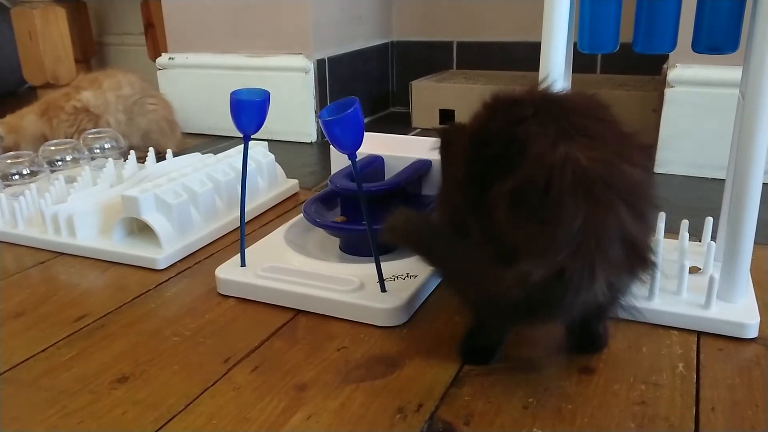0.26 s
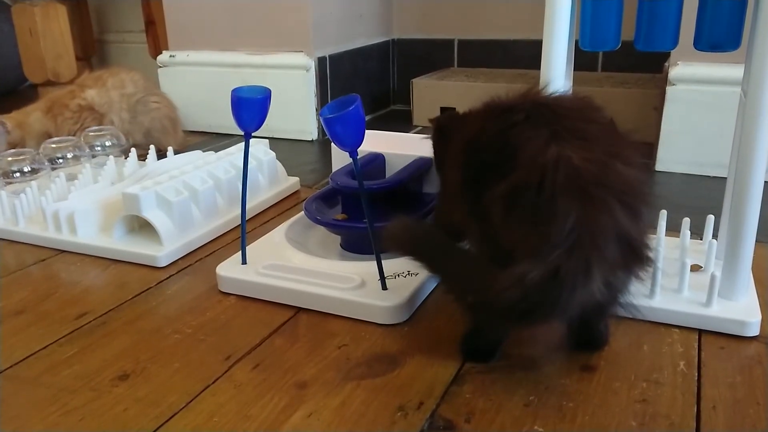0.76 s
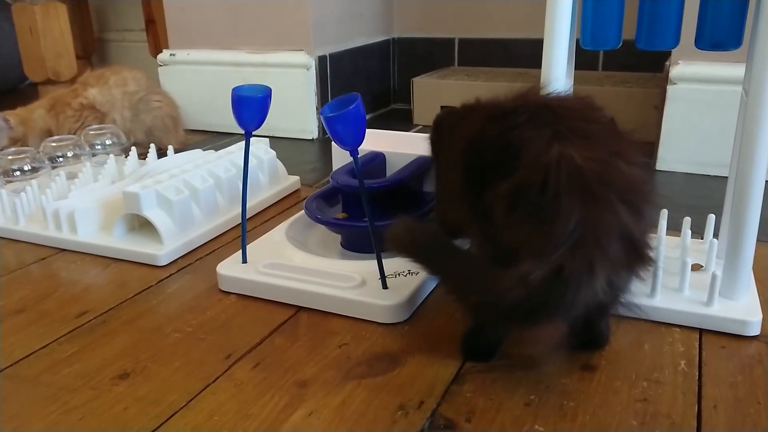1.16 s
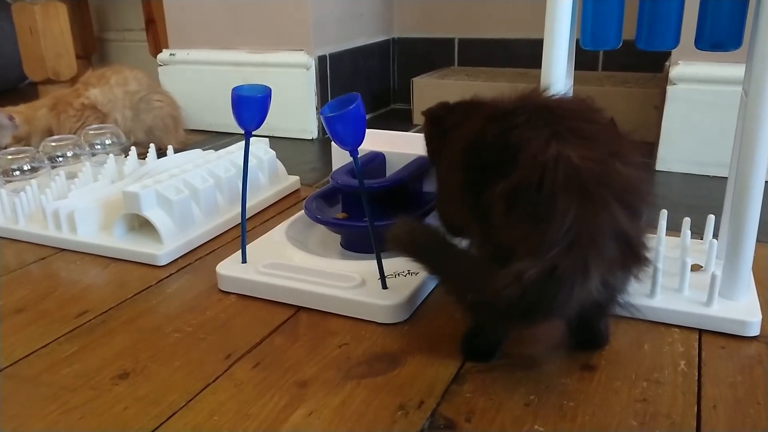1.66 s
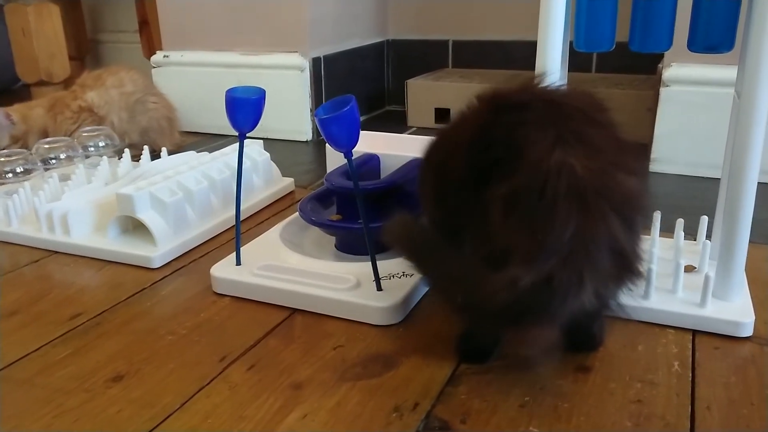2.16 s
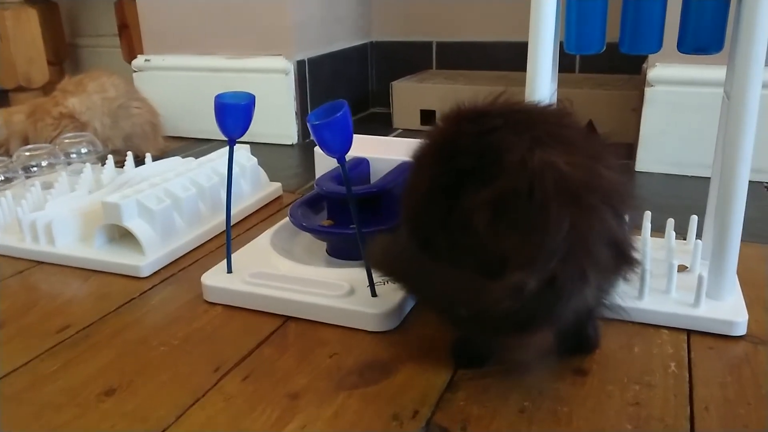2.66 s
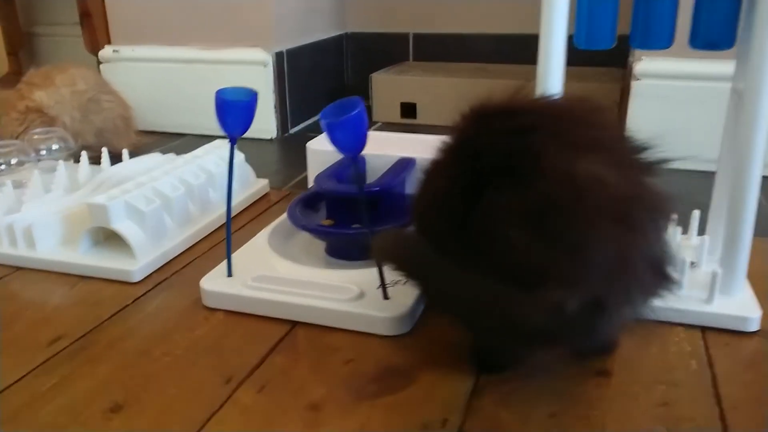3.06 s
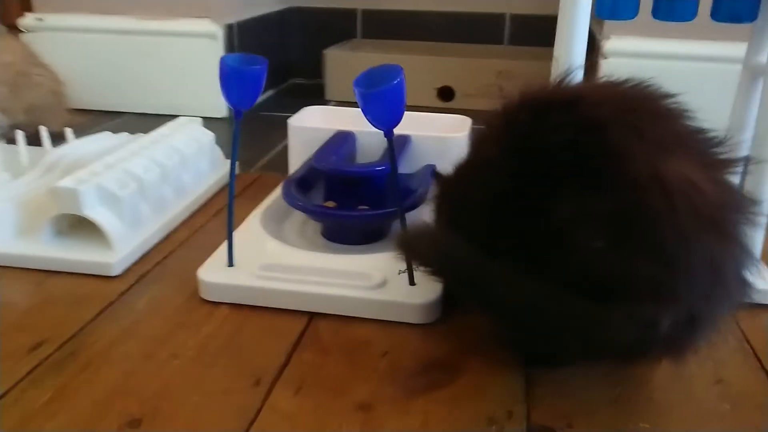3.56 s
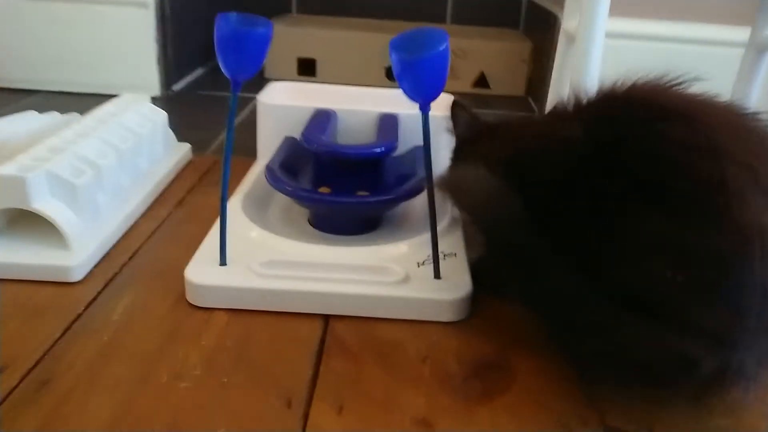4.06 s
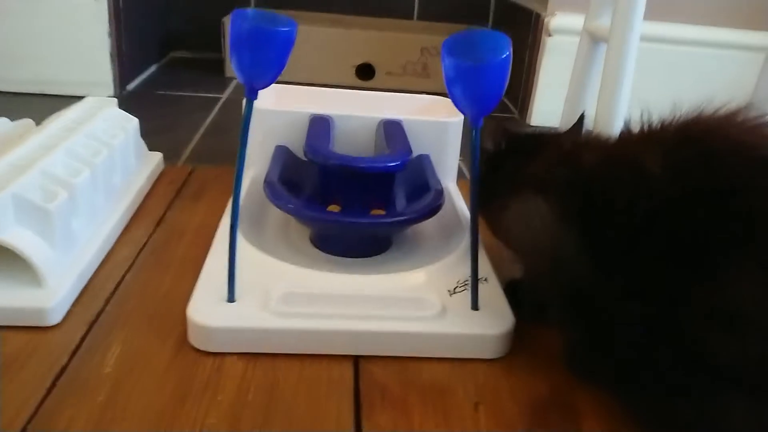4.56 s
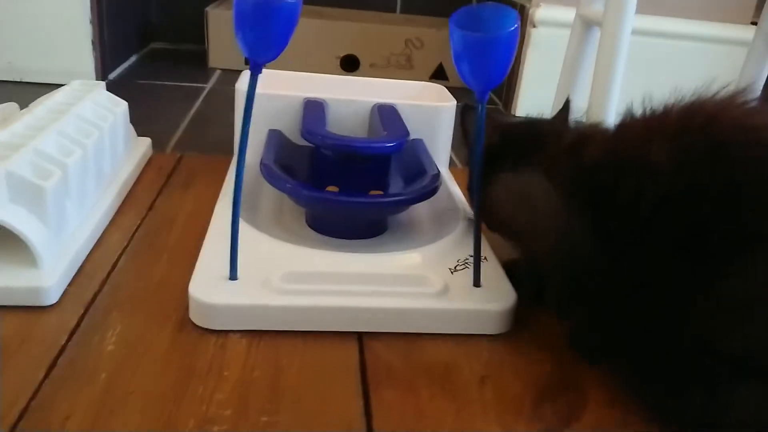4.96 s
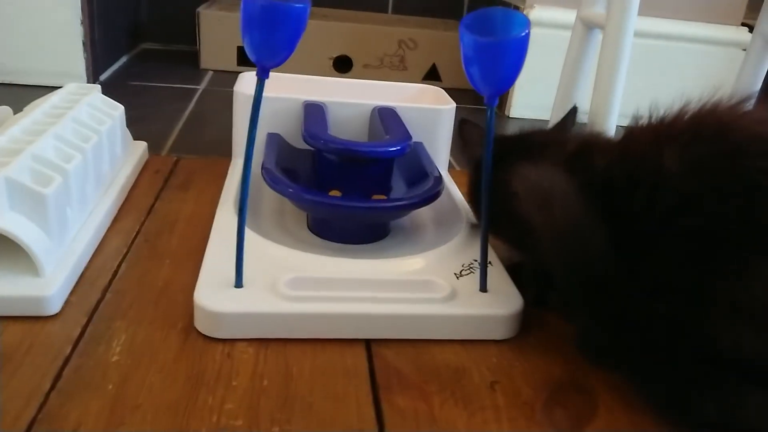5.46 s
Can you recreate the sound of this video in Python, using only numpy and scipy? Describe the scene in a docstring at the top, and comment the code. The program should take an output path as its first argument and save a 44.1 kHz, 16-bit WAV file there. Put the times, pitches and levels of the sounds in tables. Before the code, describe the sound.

A kitten paws a plastic feeder with light clicks, then fingers rub, creak and thump loudly against the microphone.

```python
"""Kitten at a puzzle feeder

A kitten paws a plastic feeder on a wooden floor: light clicks ring in a small room, and claws squeak. Then a
hand-held camera is moved: fingers bump, slip and creak at its two microphone ports. Cloth and fur rustle over
room tone and mains hum. The left port is open and bright; the right one lies under the hand and hears the room
muffled."""
import sys
import numpy as np
from scipy import signal
from scipy.io import wavfile
from scipy.ndimage import uniform_filter1d

SR = 44100
rng = np.random.default_rng(int(sys.argv[2]) if len(sys.argv) > 2 else 0)


def unload_audio(sound):
    """Save the sound as a 16-bit wav file, at the path given as the first command line argument."""
    columns = np.transpose(np.atleast_2d(sound))
    # keep every value between -1 and 1, then stretch to whole-number steps
    steps = np.round(np.clip(columns, -1, 1) * 32767)
    wavfile.write(sys.argv[1], SR, steps.astype(np.int16))


N = 252250

# Tone of skin scraping the right port. Each row: frequency in Hz, relative level in dB.
SKIN_SPECTRUM = [(300, -52.5), (700, -47.5), (1500, -46.5), (2500, -49.5), (3500, -52.5), (4800, -59.5),
                 (6000, -80.5), (7500, -70.5), (10000, -70.5), (12500, -78.5), (15500, -83)]


def feeder_clicks():
    """A claw or treat chatters against dead plastic; the room smears each contact into a tail."""
    # Each row: start in seconds, relative level in dB, bright edge in dB against it, chatter rise in ms.
    contacts = [(0.538, -37, -20, 1.94), (0.56, -26.5, -19, 1.9), (0.734, -46, -11, 2.1),
                (0.756, -37.5, -18.5, 2.1), (0.898, -46, -15, 1.88), (1.221, -39, -11.5, 1.81),
                (1.471, -40.5, -20, 1.48), (1.576, -52.5, -15.5, 4.7), (1.714, -51.5, -12, 3.5),
                (1.836, -49, 17.5, 0.85), (1.878, -42, -7, 2.14), (1.886, -44.5, 8.5, 1.96),
                (1.930, -34, -5, 0.9), (3.378, -44.5, 8.5, 0.87), (4.498, -43, -13, 2.4),
                (4.648, -46.5, -12, 1.26), (4.78, -48, -17, 0.98), (4.93, -53.5, -24, 1.4),
                (4.984, -44, -14, 1.46), (5.405, -52, -21, 2), (5.51, -54, -15, 1.75)]
    # A hollow clack and its hard, bright edge. Each row: frequency in Hz, gain in dB.
    clack_eq = [(700, -32), (1500, -7), (1950, 3), (2450, -3.5), (2950, -4), (3450, -3), (3900, -5),
                (4700, -5.5), (5700, -1), (6800, -17), (11000, -52)]
    edge_eq = [(2500, -8.5), (4000, 5), (8000, 2), (10500, -2.5), (12000, -26)]
    direct, send = np.zeros((2, 2, N))
    t = np.arange(4000) / SR
    chatter = rng.standard_normal((len(contacts), 2, len(t)))
    for (start, db, edge_db, ms), noise in zip(contacts, chatter):
        rattle = noise[:, :200] * np.exp(-t[:200] / .002) / 16
        rattle[:, 0] = 1  # one blow and a little rattle give each tail its own colour
        fill = ms ** 1.48  # longer contacts fill the room more
        for layer, gain in enumerate(gain_of([db, db + edge_db])):
            add(direct[layer], start, gain * noise[layer] * pulse(1000 * t / ms))
            add(send[layer], start + ms / 1000, gain * fill * rattle[layer])
    direct, send = (colour(clack, clack_eq) + colour(edge, edge_eq) for clack, edge in (direct, send))
    return gain_of(4.0) * direct + gain_of(19.5) * room_reverb(send)


def claw_squeaks():
    """A claw drags on plastic: short, fuzzy tones that swell and fade."""
    # Each row: start in seconds, length in seconds, pitch in Hz, level in dB.
    drags = [(1.384, 0.058, 5340, -63.5), (1.56, 0.017, 2440, -54), (1.682, 0.047, 3330, -59)]
    fuzz = 0.064  # bandwidth as a share of the pitch
    out = np.zeros(N)
    for start, length, hz, db in drags:
        t = np.arange(0, length, 1 / SR)
        wander = uniform_filter1d(rng.standard_normal((2, 4000)), round(SR / (fuzz * hz)))[:, :len(t)]
        tone = (np.exp(2j * np.pi * hz * t) * (wander[0] + 1j * wander[1])).real
        swell = np.sqrt(np.sin(np.pi * t / length))
        add(out, start, gain_of(db) * swell * unit_rms(tone))
    return out


def hand_bumps():
    """Each push of the hand moves a diaphragm once: a thump, dulled by soft flesh."""
    # Left port, then right. Each row: start in seconds, push in dB, rise time in ms.
    pushes = [
        [(1.773, -11.5, 13), (2.359, -12, 11), (2.476, -10, 11), (2.553, -4, 12.5), (2.637, -5.5, 8.7),
         (2.752, -11.5, 8.3), (2.772, -10, 6.1), (2.786, -1.5, 16.4), (2.889, -13.5, 8.4), (2.904, -6, 8.3),
         (3.376, -5, 13), (4.832, -12.5, 9.8), (5.691, -14.5, 2.3)],
        [(3.002, -11.5, 0.16), (3.111, -15, 7.7), (3.531, -7.5, 0.92), (3.551, -8, 1.8), (3.573, -2, 0.65),
         (3.71, -4, 3.9), (3.898, 1.5, 3), (3.967, 2, 2.8), (4.007, -6.5, 0.93), (4.038, -7, 0.52),
         (4.111, -11.5, 1.35), (4.195, 7, 3.7), (4.322, 7.5, 11.8), (4.452, 5, 2.3), (4.542, 12, 7.7),
         (4.577, 2.5, 6.1), (4.677, -8, 7.7), (4.833, -10, 1.4), (4.853, -1, 3.6), (5.35, 0.5, 9.5),
         (5.372, -2.5, 5.9), (5.441, -15, 5.8), (5.688, -7, 2.7)],
    ]
    flesh_hz = 450
    out = np.zeros((2, N))
    for port, rows in zip(out, pushes):
        for start, db, ms in rows:
            add(port, start, -gain_of(db) * pulse(np.arange(4000) / (SR * ms / 1000)))
    return butterworth(out, 2, flesh_hz)


def skin_ticks():
    """Skin slips on the right port: a dry snap and a cavity ring of two or three cycles."""
    # Each row: start in seconds, relative level in dB, ring pitch in Hz.
    slips = [(1.769, -30, 1610), (2.355, -35, 520), (2.375, -32.5, 1650), (2.442, -47, 1400),
             (2.486, -40.5, 910), (2.525, -43.5, 885), (2.549, -41.5, 990), (2.595, -37.5, 523),
             (2.634, -37.5, 470), (2.889, -38.5, 467), (3.001, -25.5, 312), (3.081, -24, 2900),
             (3.114, -13, 2380), (3.221, -8, 2100), (3.279, -9, 2130), (3.434, -11, 2700),
             (3.527, -6.5, 2740), (3.549, -7.5, 2600), (3.571, -5.5, 1940), (3.62, -7, 1800),
             (3.736, -6.5, 635), (3.739, -9.5, 580), (3.766, -5.5, 760), (4.02, -14, 610),
             (4.037, -18.5, 605), (4.069, -33, 450), (4.107, -25.5, 430), (4.181, -32, 600),
             (4.324, -28.5, 392), (4.45, -30.5, 340), (4.577, -17, 584)]
    snaps, rings = np.zeros((2, N))
    t = np.arange(1000) / SR
    bursts = rng.standard_normal((len(slips), len(t))) * np.exp(-t / .0012)
    for (start, db, hz), burst in zip(slips, bursts):
        edge_hz = 2860 + 0.38 * hz  # softer skin: lower ring, duller snap
        add(snaps, start, gain_of(db) * butterworth(burst, 8, edge_hz))
        add(rings, start, gain_of(db + 2.0) * np.sin(2 * np.pi * hz * t) * pulse(hz * t / 0.56))
    rings = butterworth(rings, 4, 4500)  # the rings carry little treble
    peak_db = max(db for hz, db in SKIN_SPECTRUM)
    right = rings + gain_of(10.0 - peak_db) * colour(snaps, SKIN_SPECTRUM)
    through_case = colour(right, [(700, -29.5), (1400, -71)])  # only the dull part reaches the left
    return np.array([through_case, right])


def finger_rubbing():
    """Skin sticks and slips, scraping and creaking on the right; the grip shakes both ports."""
    # Each row: start in seconds, length in seconds, scrape in dB, creak in dB.
    slides = [(2.37, 0.21, -71, -47.5), (2.62, 0.99, -65, -43.5), (3.086, 0.024, -27, -28),
              (3.13, 0.0048, -33, -37), (3.184, 0.0032, -35.5, -45), (3.199, 0.0069, -33, -21),
              (3.216, 0.038, -24.5, -34), (3.33, 0.082, -39.5, -40), (3.374, 0.017, -33.5, -25),
              (3.415, 0.055, -26.5, -25.5), (3.5, 0.024, -22.5, -26), (3.528, 0.0037, -10.5, -13),
              (3.551, 0.0043, -14.5, -10), (3.571, 0.015, -14.5, -24.5), (3.595, 0.041, -18, -17.5),
              (3.665, 0.044, -41, -26.5), (3.737, 0.025, -39, -17), (3.757, 0.029, -37, -19),
              (3.838, 0.013, -40.5, -22.5), (3.895, 0.024, -35.5, -14), (3.948, 0.059, -38.5, -27.5),
              (4.19, 0.012, -48, -27.5), (4.569, 0.013, -39.5, -24.5), (4.68, 0.012, -57, -40),
              (4.832, 0.024, -58.5, -35.5)]
    # Strength of the shaking. Each row: time in seconds, left level in dB, right level in dB.
    grip = [(2.33, -48, -74), (2.38, -33.5, -50.5), (3.1, -34, -66), (3.6, -35, -47), (3.68, -55, -51),
            (3.76, -35, -24), (4.05, -40, -25), (4.3, -62, -28.5), (5.1, -53, -42), (5.72, -51, -43)]
    # A dull creak and a low rumble. Each row: frequency in Hz, relative level in dB.
    creak_eq = [(150, 6.5), (350, -5), (750, -11), (2000, -22), (7000, -77)]
    shake_eq = [(90, -2), (200, -22.5), (500, -33), (900, -42.5), (2000, -76.5)]
    # Skin grips fast and lets go slowly.
    scraping, creaking = (stroke_envelope(slides, column, 4000, 1499) for column in (2, 3))
    bunches = gain_of(3.3 * unit_rms(uniform_filter1d(rng.standard_normal(N), 160)))
    slips = bunches * (grains(5000, 2.3) + 0.52 * grains(350, 2.5))
    spectrum = signal.stft(colour(slips, SKIN_SPECTRUM), nperseg=128)[2]
    ridges = unit_rms(uniform_filter1d(rng.standard_normal(spectrum.shape), size=4, axis=0))
    spectrum *= gain_of(2.3 * ridges)  # each slip has its own colour
    scrape = scraping * unit_rms(signal.istft(spectrum, nperseg=128)[1][:N])
    creak = creaking * unit_rms(colour(grains(320, 2.2), creak_eq))
    left, right = (fader(grip, side) * unit_rms(colour(grains(70, 2.8), shake_eq)) for side in (1, 2))
    through_case = colour(scrape + creak, [(300, -29), (700, -43.0), (1400, -73)])
    return np.array([left + through_case, right + scrape + creak])


def cloth_rustle():
    """Cloth and fur brush in fine, patchy grains; a finger brushes past the left port only."""
    # Each row: time in seconds, rustle level in dB.
    movement = [(0, -76), (.35, -67), (1.7, -70), (2.45, -75), (2.63, -67.5), (2.73, -55.5), (2.95, -53),
                (3.3, -66), (3.37, -50.5), (3.5, -58.5), (3.7, -62), (4.03, -66.5), (4.2, -78.5),
                (4.35, -62), (4.8, -71.5), (4.9, -81), (5.4, -76.5), (5.72, -76.5)]
    # Tone of the fibres. Each row: frequency in Hz, relative level in dB.
    fibre_eq = [(1500, -104), (2200, -87), (2900, -95), (4200, -91.5), (5300, -84.5), (6600, -92),
                (8000, -87.5), (10500, -93), (15500, -112.2)]
    # Each row: start in seconds, length in seconds, relative level in dB.
    sweeps = [(3.522, 0.018, -44), (3.74, 0.059, -49.5), (3.969, 0.015, -33)]
    fibres = np.array([unit_rms(colour(grains(9000, 2.4), fibre_eq)) for _ in range(2)])
    spectrum = signal.stft(fibres, nperseg=512)[2]
    patches = uniform_filter1d(rng.standard_normal(spectrum.shape[1:]), 7, axis=0)
    patches = unit_rms(uniform_filter1d(patches, 10, axis=1))  # narrow bands come and go
    scuffs = unit_rms(signal.istft(spectrum * gain_of(3.2 * patches), nperseg=512)[1][:, :N])
    brush = butterworth(scuffs[0], 2, 1700, "high") * stroke_envelope(sweeps, 2, 3988, 2498)
    left, right = fader(movement, 1) * scuffs
    return np.array([left + brush, right])


def room_reverb(x):
    """The small room answers with two unrelated tails, the treble dying a little sooner."""
    # Each row: frequency in Hz, seconds to fall by 60 dB.
    decay_times = [(1000, 0.49), (9000, 0.45)]
    hz, frame_s, spectrum = signal.stft(rng.standard_normal((2, SR // 2)), SR, nperseg=256)
    decay = gain_of(-60 * frame_s / value_at(decay_times, hz)[:, None])
    tail = signal.istft(spectrum * decay, SR, nperseg=256)[1]
    t = np.arange(tail.shape[1]) / SR
    tail *= 1 + 1.18 * np.exp(-(t / 0.012) ** 4)  # nearby surfaces answer first and loudest
    tail *= np.minimum(t / 0.0038, 1)  # reflections build up
    return signal.fftconvolve(x[None], tail / np.linalg.norm(tail[0]), axes=1)[:, :N]


def room_tone():
    """A steady bed of room and electronics noise, with a wavering mains hum."""
    # Noise at each port. Each row: frequency in Hz, density in dB per Hz.
    left_air = [(60, -70), (100, -94), (150, -89), (250, -103), (1000, -109), (3000, -112), (4300, -116),
                (5300, -110), (6500, -118), (10500, -120), (12000, -136)]
    right_air = [(60, -73), (100, -96), (150, -92), (300, -101), (550, -85.5), (1050, -98), (1500, -90.5),
                 (2500, -99), (3200, -101), (4500, -116), (6000, -135)]
    # Left port, then right. Each row: hum level in dB.
    hum_db = [
        [-62],
        [-70.5],
    ]
    hum_hz = 100.5
    noise = rng.standard_normal((2, N)) * np.sqrt(SR / 2)
    waver = 1 + 0.28 * unit_rms(uniform_filter1d(rng.standard_normal(N), 6000))
    hum = gain_of(hum_db) * waver * np.sin(2 * np.pi * hum_hz * np.arange(N) / SR)
    return np.array([colour(noise[0], left_air), colour(noise[1], right_air)]) + hum


def grains(per_second, spread_db):
    """Scattered tiny slips of random sign, a few of them large."""
    size = gain_of(spread_db * np.minimum(rng.exponential(1, N), 4)) * rng.choice([-1., 1.], N)
    return unit_rms(size * (rng.random(N) < per_second / SR))


def stroke_envelope(rows, column, in_db_per_s, out_db_per_s):
    """Strokes swell, hold and fade: quick ones at the given rates, longer ones more slowly."""
    t = np.arange(N) / SR
    quick_s = 0.019
    envelope = np.zeros(N)
    for row in rows:
        start, length = row[:2]
        drop_db = in_db_per_s * np.maximum(start - t, 0) + out_db_per_s * np.maximum(t - start - length, 0)
        envelope += gain_of(row[column] - np.clip(quick_s / length, .2, 1) * drop_db)
    return envelope


def fader(rows, column):
    """Gain curve from a dB column, silent outside the table."""
    rows = np.array(rows)
    return gain_of(np.interp(np.arange(N) / SR, rows[:, 0], rows[:, column], left=-200, right=-200))


def pulse(age):
    """Rises to 1 at age 1, then dies away."""
    return age * np.exp(1 - age)


def colour(x, eq):
    """Minimum-phase equaliser through (Hz, dB) points."""
    log_gain = np.log(gain_of(value_at(eq, abs(np.fft.fftfreq(4096, 1 / SR)))))
    taps = np.fft.ifft(np.exp(np.conj(signal.hilbert(log_gain)))).real[:2048]
    return signal.oaconvolve(x, taps)[:len(x)]


def butterworth(x, order, hz, kind="low"):
    """Low-pass or high-pass filter."""
    return signal.sosfilt(signal.butter(order, hz, kind, fs=SR, output="sos"), x)


def value_at(points, hz):
    """Reads a table along a log-frequency axis."""
    frequencies, values = np.transpose(points)
    return np.interp(np.log(hz + 1), np.log(frequencies + 1), values)


def gain_of(db):
    """Decibels to gain."""
    return 10 ** (np.asarray(db) / 20)


def unit_rms(x):
    """Scales to rms 1."""
    return x / np.sqrt(np.mean(x ** 2) + 1e-20)


def add(mix, start, sound):
    """Mixes a sound in at start seconds."""
    part = mix[round(start * SR):][:len(sound)]
    part += sound[:len(part)]


def scene():
    """Airborne sound passes the covering hand on the right; handling reaches the ports directly."""
    # The hand over the right port, then its tighter regrip. Each row: frequency in Hz, gain in dB.
    hand_eq = [(500, -3.5), (1000, 12.5), (1500, 8.5), (2000, 5.5), (2700, 14), (3500, 8.5), (4500, -8),
               (5300, -57.5)]
    regrip_eq = [(2200, -0.5), (2700, 2), (3100, -4), (3800, -8.5)]
    regrip_s = 4.2
    left, right = feeder_clicks() + claw_squeaks() + cloth_rustle()
    air_left, air_right = room_tone()
    right = colour(right, hand_eq) + air_right
    right = np.where(np.arange(N) < regrip_s * SR, right, colour(right, regrip_eq))
    return np.array([left + air_left, right]) + skin_ticks() + hand_bumps() + finger_rubbing()


def record(dry):
    """A steep low-cut against handling noise, soft overload, then the band limit."""
    low_cut_hz, ceiling, top_hz = 60, .9, 15900
    cut = butterworth(dry, 6, low_cut_hz, "high")
    squashed = cut / (1 + (cut / ceiling) ** 4) ** .25
    band_limit = signal.firwin(511, top_hz, window=("kaiser", 9), fs=SR)
    return signal.oaconvolve(squashed, band_limit[None], "same")


dry = scene()
out = record(dry)
unload_audio(out)
```